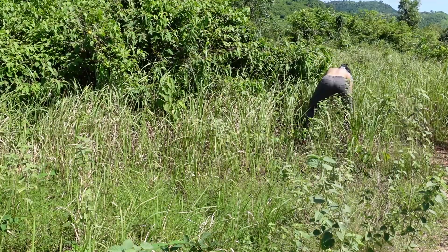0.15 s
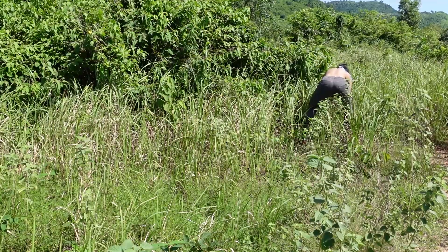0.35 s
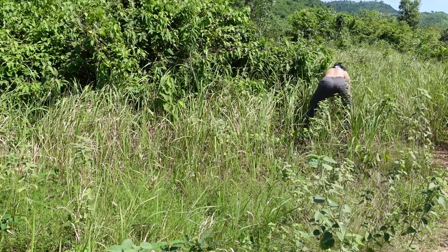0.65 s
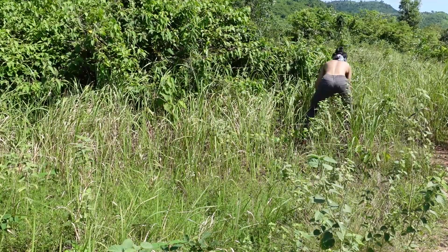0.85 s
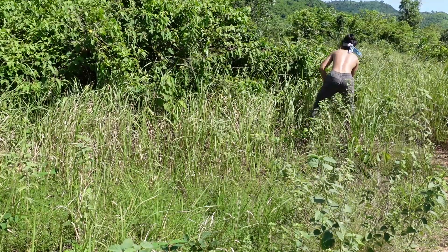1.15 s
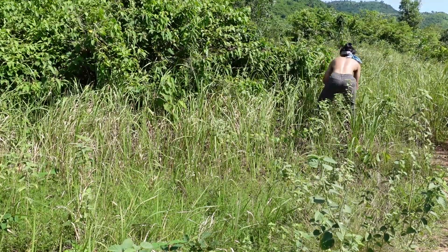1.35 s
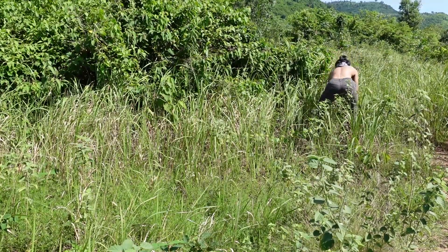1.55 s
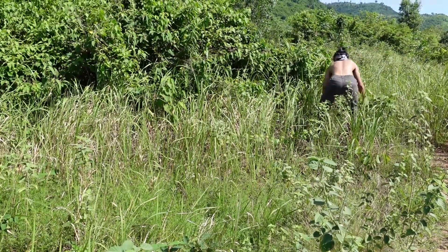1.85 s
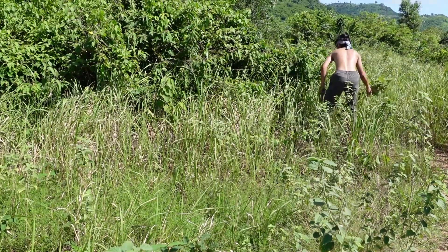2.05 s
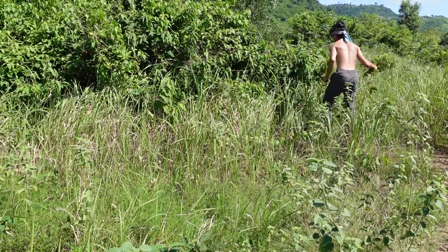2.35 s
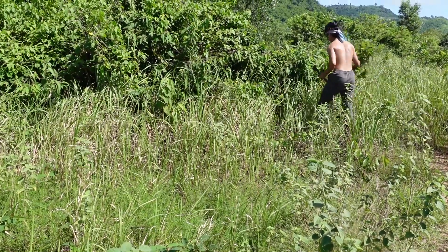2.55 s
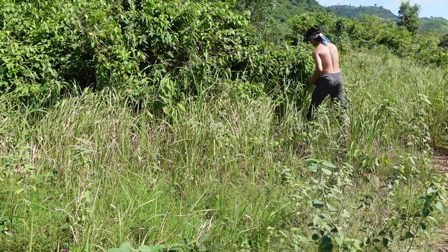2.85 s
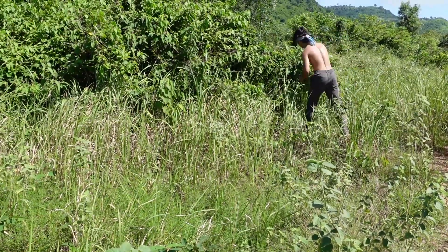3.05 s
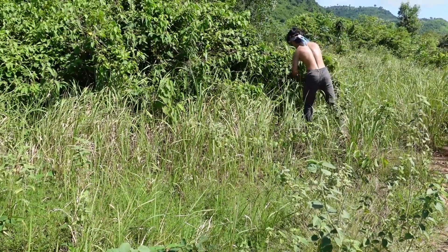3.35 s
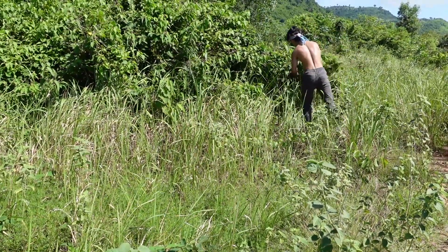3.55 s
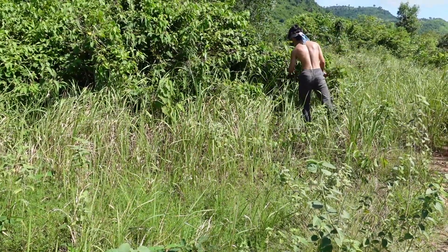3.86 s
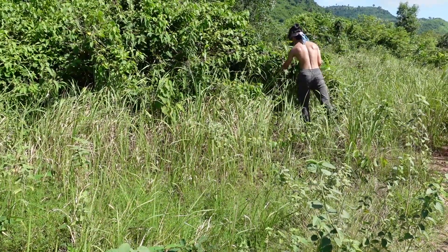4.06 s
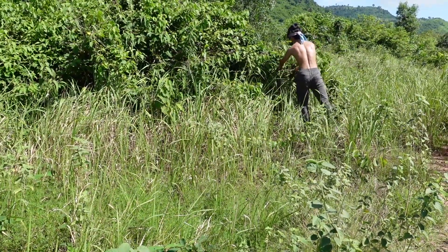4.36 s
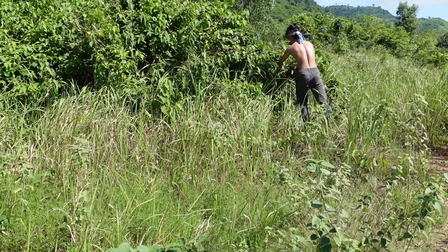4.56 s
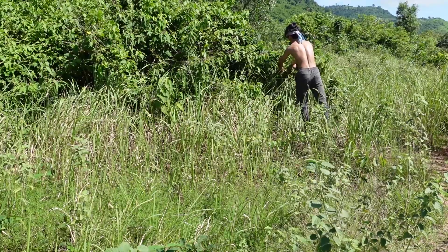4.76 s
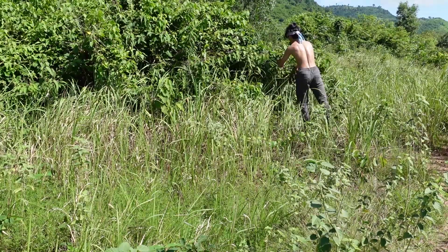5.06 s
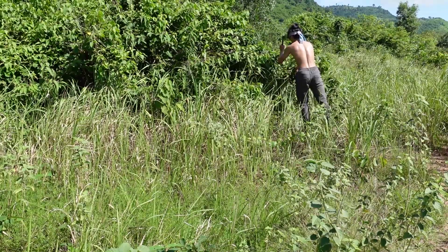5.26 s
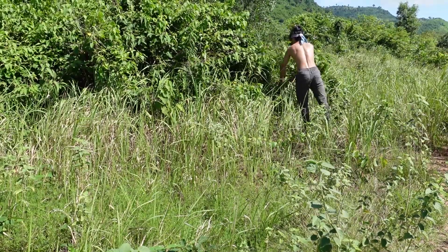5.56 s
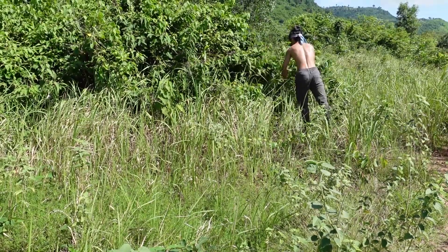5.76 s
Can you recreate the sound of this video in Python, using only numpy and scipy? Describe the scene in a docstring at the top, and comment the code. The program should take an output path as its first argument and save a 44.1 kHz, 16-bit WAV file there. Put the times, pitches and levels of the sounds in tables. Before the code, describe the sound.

Tall dry grass rustles and crackles as someone pushes through it, snapping stems, with a small bird and a cricket chirping faintly behind.

```python
"""Tall dry grass hisses and crackles as someone pulls and wades through it a few metres away.
Many tiny breaks shake the blades, stems and branches; stems snap, one creaks, and three blows thud
into the brush. Behind this a small bird whistles falling notes, a cricket rubs its wings in bouts
of chirps, faint peeps come from far off and two insects drone by over a low, distant wind."""
import sys
import numpy as np
from scipy import signal
from scipy.fft import rfft, irfft, next_fast_len
from scipy.io import wavfile
from scipy.ndimage import uniform_filter1d

SR = 44100
rng = np.random.default_rng(int(sys.argv[2]) if len(sys.argv) > 2 else 0)


def wav_out(sig):
    """Save sig, one row per channel (or a flat mono array), as 16-bit PCM at SR to the path in sys.argv[1]."""
    wavfile.write(sys.argv[1], SR, np.round(np.clip(np.atleast_2d(sig).T, -1, 1) * 32767).astype(np.int16))


N = 260631
T = np.arange(N) / SR


def undb(db):
    """Turn decibels into a number to multiply by."""
    return 10 ** (np.asarray(db) / 20)


def colour(x, points):
    """Turn the lows and highs of x up or down along a curve of (f/Hz, level/dB) points."""
    size = next_fast_len(N + SR // 10)
    hz, db = np.transpose(points)
    axis = np.maximum(np.arange(size // 2 + 1) * SR / size, 1)
    gain = undb(np.interp(np.log(axis), np.log(hz), db))
    return irfft(rfft(x, size) * gain, size)[..., :N]


def unit(x):
    """Scale x to an average strength (rms) of 1."""
    return x / np.sqrt(np.mean(x ** 2))


def wander(per_second):
    """A random curve that changes about this many times a second."""
    return unit(uniform_filter1d(rng.standard_normal(N), SR // per_second))


def add(out, start_s, sound):
    """Mix a sound into out at the given time."""
    i = int(start_s * SR)
    out[i:i + len(sound)] += sound[:len(out) - i]


def ring(modes, t):
    """A struck thing rings with fading tones; t60 is the time a tone takes to fall by 60 dB."""
    return sum(undb(db) * np.sin(2 * np.pi * hz * t) * 1000 ** (-t / t60) for hz, db, t60 in modes)


def echo(x, t60, db):
    """Sound bounces off leaves and trunks and comes back as a fading blur."""
    t = T[:int(t60 * SR)]
    tail = unit(rng.standard_normal(len(t)) * 1000 ** (-t / t60)) / np.sqrt(len(t))
    return undb(db) * signal.fftconvolve(x, tail)[:N]


# How strong the wind is from low to high: f/Hz, level/dB
WIND_SPECTRUM = [(18, -72), (30, -58), (55, -14.5), (179, -1), (221, -1), (252, 0.5), (1100, -14),
                 (1460, -15.5), (1960, -11.5), (3060, -25), (6210, -16), (6720, -22), (8080, -23.5),
                 (16000, -23)]
def wind():
    """Far wind in the trees, wavering a little."""
    return unit(colour(rng.standard_normal((2, N)), WIND_SPECTRUM)) * undb(-60 + .6 * wander(8))


# A fly and a bee passing by: t/s, wingbeat f/Hz, level/dB
FLY_PATH = [(1.73, 297, -70), (1.77, 297, -62), (1.8, 304, -60), (1.86, 298, -62), (1.94, 297, -70)]
BEE_PATH = [(2.3, 213, -73), (2.38, 205, -66), (2.42, 215, -52.5), (2.48, 205.6, -65), (2.6, 226.3, -63),
            (2.7, 210.5, -64), (2.78, 212, -75)]
# The tones in the fly's buzz: multiple of the wingbeat, level/dB
FLY_TONES = [(2, -3), (3, -12), (4, -1), (5, 0), (6, -2), (7, -12)]
def insect(path, tones, lead):
    """Beating wings hum at multiples of their rate; the left side is ahead by lead radians."""
    s, hz, db = np.transpose(path)
    phase = 2 * np.pi * np.cumsum(np.interp(T, s, hz)) / SR
    fade = np.clip(np.minimum(T - s[0], s[-1] - T) / .033, 0, 1)
    buzz = sum(undb(level) * np.sin(k * phase + np.array([[lead], [0]])) for k, level in tones)
    return np.sqrt(2) * buzz * fade * undb(np.interp(T, s, db))


# Distant peeps: t/s, length/s, level/dB
PEEPS = [(3.375, .026, -63), (3.575, .02, -66), (3.625, .022, -64), (3.838, .02, -67)]
def peeps(hz=8050):
    """A few faint, very high peeps from far off, all on one pitch."""
    out = np.zeros(N)
    for s, length, db in PEEPS:
        t = T[:int(length * SR)]
        swell = np.sqrt(np.sin(np.pi * t / length))
        add(out, s, undb(db) * swell * np.sin(2 * np.pi * hz * t))
    return out


# Runs of cricket chirps: start t/s, end t/s, chirp rate/Hz, level/dB
CHIRP_BOUTS = [(.143, .9, 25.2, -50.5), (1.345, 2.11, 25, -52), (2.761, 3.365, 25.35, -51.5),
               (3.842, 4.51, 25.6, -54), (5.028, 5.8, 26.1, -50.5)]
def cricket(wing_hz=4975, low_wing_hz=4700, stroke_s=.0085, spacing_s=.0112):
    """Two wing strokes make a chirp; each rings the wing at a main pitch and a weaker, lower one."""
    out = np.zeros(N)
    progress = T[:int(stroke_s * SR)] / stroke_s
    swell = np.sin(np.pi * progress ** 1.5)  # grows, then stops short
    low_swell = undb(-10) * np.sin(np.pi * progress)
    low_phase = 2 * np.pi * low_wing_hz * stroke_s * progress
    for start, end, rate, db in CHIRP_BOUTS:
        for k, s in enumerate(np.arange(start, end, 1 / rate)):
            detune, accent, offset = rng.standard_normal((3, 2))
            soft_start_db = -2.8 * np.exp(-k / 3)
            for stroke in range(2):
                hz = wing_hz * (1 + .006 * detune[stroke] - .04 * (progress - .6))
                main = swell * np.sin(2 * np.pi * np.cumsum(hz) / SR + 2 * offset[stroke])
                low = low_swell * np.sin(low_phase + 2 * offset[1 - stroke])
                gain = undb(db + .71 * accent[stroke] + 1.2 * stroke + soft_start_db)
                add(out, s + (stroke - 1) * spacing_s, gain * (main + low))
    out *= 1 + .2 * wander(900)  # the wing's tiny teeth catch unevenly
    return out + echo(out, t60=.13, db=-4)


# The bird's phrases: first long note t/s, number of short notes, of long notes, middle note level/dB
PHRASES = [(.0105, 0, 3, -50), (1.247, 5, 3, -48), (2.546, 4, 2, -46), (3.649, 6, 3, -51),
           (4.902, 4, 3, -45)]
def song(short_step_s=.0372, middle_step_s=.052, long_step_s=.0605):
    """List the notes as (t/s, kind, level/dB): short ones growing louder, a middle one, long ones."""
    notes = []
    for s, shorts, longs, db in PHRASES:
        middle_s = s - middle_step_s
        for k in range(1, shorts + 1):  # counting back from the middle note
            notes.append((middle_s - k * short_step_s, "short", -57 - 7 * 2 ** (k - shorts)))
        notes.append((middle_s, "middle", db))
        notes += [(s + k * long_step_s, "long", -45) for k in range(longs)]
    return [note for note in notes if note[0] >= 0]


# Each kind of bird note: length/s, top f/Hz, bottom f/Hz
NOTE_SHAPES = {"short": (.026, 6450, 6050), "middle": (.04, 6570, 5900), "long": (.047, 7150, 5860)}
def bird(throat_hz=6300, throat_width_hz=330):
    """Falling whistles, loudest as they pass the pitch at which the throat rings."""
    out = np.zeros(N)
    for s, kind, db in song():
        length, top_hz, bottom_hz = NOTE_SHAPES[kind]
        progress = T[:int(length * SR)] / length
        hz = bottom_hz + (top_hz - bottom_hz) * (1 - progress) ** 1.5
        throat = 1 / (1 + ((hz - throat_hz) / throat_width_hz) ** 2)
        fade = np.clip(np.minimum(progress, 1 - progress) * length / .003, 0, 1)
        add(out, s, undb(db) * throat * fade * np.sin(2 * np.pi * np.cumsum(hz) / SR))
    bounce = undb(-17) * np.roll(out, int(.033 * SR))  # one clear echo off the bushes
    return out + bounce + echo(out, t60=.22, db=-9)


# Slips of a bent stem: t/s, peak level/dB
SLIPS = [(3.628, -50), (3.64, -45), (3.651, -44), (3.664, -49), (3.68, -49), (3.703, -50)]
# The tones that stem rings with: f/Hz, level/dB, fade t60/s
CREAK_TONES = [(2680, 0, .011), (3400, -3, .008), (4600, -7, .006)]
def creaks():
    """A bent stem slips a few times, and each short scrape makes it ring."""
    out, t = np.zeros(N), T[:SR // 20]
    for s, db in SLIPS:
        scrape = rng.standard_normal(len(t)) * np.exp(-t / .006)
        rasp = np.convolve(scrape, ring(CREAK_TONES, t))
        add(out, s, undb(db) * rasp / np.abs(rasp).max())
    return out


# Blows into the brush: t/s, level/dB, push length/s
BLOWS = [(0.579, -33.5, 0.00026), (1.659, -38.5, 0.0047), (5.584, -43, 0.0013)]
# The tones of the ground and thick stems: f/Hz, level/dB, fade t60/s
THUD_TONES = [(240, 0, .12), (165, -13, .1), (330, -6, .07), (918, -3, .06)]
def thuds():
    """A push rings the ground and thick stems; the longer the push, the duller the thud."""
    out = np.zeros(N)
    for s, db, push_s in BLOWS:
        push = np.hanning(int(max(push_s, .0003) * SR) + 2)
        add(out, s, undb(db) * np.convolve(ring(THUD_TONES, T[:SR // 4]), push / push.sum()))
    bass_cut = signal.butter(3, 140, "highpass", fs=SR, output="sos")  # small things give no deep bass
    return signal.sosfilt(bass_cut, out)


# Stems breaking: t/s, level/dB, ring f/Hz, fade scale/s
SNAPS = [(0.557, -32, 4000, 0.03), (0.5624, -20.5, 4700, 0.06), (.5745, -27, 5000, .03),
         (.584, -23, 4500, 0.011), (0.591, -29, 4000, 0.022), (0.5778, -14, 2900, 0.012),
         (0.778, -33, 4300, .022), (1.1, -27, 6800, .025), (1.1468, -29, 5000, .03),
         (1.17, -29.5, 6190, 0.018), (1.6194, -34, 2570, 0.015), (1.631, -34, 3700, .015),
         (1.637, -32, 3000, .018), (1.674, -30, 4000, 0.0069), (1.66, -20.5, 2800, 0.014),
         (1.669, -24, 3400, 0.018), (2.021, -40, 3960, .02), (2.109, -33.5, 4000, .02),
         (2.34, -34, 6400, .015), (2.4285, -31, 11000, .008), (2.85, -37, 5000, .01),
         (3.052, -40, 9000, 0.024), (3.219, -40, 8000, .02), (4.724, -34, 11000, .02),
         (4.758, -34, 9000, .01), (4.808, -30, 6800, .01), (4.866, -29, 9000, .02), (5.141, -39, 9100, .02),
         (5.524, -42, 6000, .03), (5.547, -29, 6000, .03), (5.579, -30, 5000, 0.03),
         (5.602, -20, 1950, 0.032), (5.7065, -11, 5000, .045), (5.7072, -11, 10000, .04),
         (5.543, -34, 4200, .02), (5.647, -24, 11000, .02), (5.724, -24, 5400, 0.016)]
def snaps():
    """A dry stem breaks: a sharp crack, a short ring and a rough tail."""
    out, t = np.zeros(N), T[:SR // 10]
    for s, db, hz, fade_s in SNAPS:
        crack = 1000 ** (-t / (.3 * fade_s))
        tail = .32 * 1000 ** (-t / (2 * fade_s))
        burst = rng.standard_normal(len(t)) * (crack + tail)
        ringing = signal.lfilter(*signal.iirpeak(hz, 1.5, SR), burst)
        snap = .16 * np.diff(burst, prepend=0) + ringing
        add(out, s, undb(db) * snap / np.abs(snap).max())
    return colour(out, [(100, -39), (900, -2)])


# Steady wading: t/s, blade level/dB, stems above blades/dB, branches above blades/dB
WADING = [(0, -47.5, -2.5, -9.5), (.256, -60.5, 1.5, -5), (.36, -74.5, 5, 7), (.5, -76, 2, 6),
          (.7, -53, -2.5, -8), (.886, -51.5, -3, -10), (.958, -55.5, 0, -11), (1.26, -58.5, -4, -5.5),
          (1.6, -74.5, 2, 11.5), (1.83, -51, -3, -9.5), (2.17, -56, -3.5, -10), (2.33, -54.5, -3, -15),
          (2.6, -47, -6.5, -19.5), (2.76, -50.5, -3.5, -9), (3.19, -64, 0.5, -5.5), (3.5, -69, 0.5, 1),
          (3.72, -85.5, 19, -5), (3.92, -79, 6, 5), (4.13, -57, -4.5, -10), (4.4, -55, -0.5, -12.5),
          (4.8, -49.5, -2.5, -12.5), (5.1, -56, 0.5, -10), (5.4, -61.5, -3, -9), (5.5, -72, 3, 1),
          (5.91, -47.5, 0.5, -13)]
# Single sweeps through the grass: peak t/s, blade level/dB, rise time/s, fade t60/s,
# stems above blades/dB, branches above blades/dB
SWEEPS = [(0.581, -38.5, 0.057, 0.32, -0.5, -7), (1.095, -52, 0.085, 0.39, -2, -19),
          (1.145, -48.5, .03, 0.18, -2, -14), (1.33, -50.5, 0.21, 2.5, -2, -22),
          (1.658, -38, 0.058, 0.3, -2, -11.5), (1.79, -63, 0.2, 0.24, 13, 5),
          (2.13, -50, 0.064, 0.35, -8, -19), (2.35, -54, .03, 0.29, -16, -24),
          (2.49, -47, 0.12, 0.09, -15, -22), (2.67, -50, 0.07, 0.15, -1, -9),
          (3.216, -58, .03, 0.45, -7, -20), (3.568, -60.5, 0.085, 0.31, -8, -22),
          (3.65, -71.5, 0.12, 0.25, 12, -11), (.81, -57.5, 0.062, 0.21, 7.5, -14),
          (2.02, -54.5, .04, 0.53, -0.5, -16), (4.106, -59, .02, .2, -12, -18),
          (4.58, -59.5, 0.069, 0.22, 9.5, -18), (4.876, -50, 0.062, 0.23, -15, -18),
          (5.056, -51, 0.2, 0.1, 0, -20), (5.552, -37.5, 0.028, .06, 0.5, -16),
          (5.588, -29.5, 0.06, 0.54, 1, -8.5), (5.73, -41, 0.17, 0.93, 1.5, -7)]
def motion(rise_db=30):
    """How loud blades, stems and branches are over time, in dB: the wading plus every sweep."""
    s, db, *above = np.transpose(WADING)
    power = undb(2 * np.array([np.interp(T, s, db + extra) for extra in (0, *above)]))
    for s, db, rise_s, t60, *above in SWEEPS:
        shape_db = -np.maximum(rise_db * (s - T) / rise_s, 60 * (T - s) / t60)
        peak_db = db + np.array([[0, *above]]).T
        power += undb(2 * (peak_db + shape_db))
    return 10 * np.log10(power)


def crackle(per_second, spread_db, fade_s):
    """The loudness of many tiny breaks: each starts at once and dies fast, and a few are far bigger."""
    happens = rng.random(N) < per_second / SR
    breaks = happens * undb(2 * spread_db * np.minimum(rng.exponential(size=N), 4))
    keep = np.exp(-1 / (fade_s * SR))
    power, _ = signal.lfilter([1], [1, -keep], breaks, zi=[breaks.mean() / (1 - keep)])
    return unit(np.sqrt(power + 1e-9))


def leaves(spectrum, db):
    """Single dry leaves tick at twelve pitches, each pitch coming in flurries."""
    out = 0
    for hz in np.geomspace(1400, 10000, 12):
        flurries = undb(5 * wander(12))
        happens = rng.random(N) < 200 / SR
        ticks = happens * rng.standard_normal(N) * flurries / np.sqrt(hz)
        out += signal.lfilter(*signal.iirpeak(hz, 12, SR), ticks)
    return unit(colour(out, spectrum)) * undb(db)


# The tone of hissing blades, crackling stems and woody branches: f/Hz, level/dB
BLADE_SPECTRUM = [(2500, -27), (4500, -4), (6000, 1), (7500, -1.5), (10500, -3), (13500, -5.5),
                  (15000, -15), (16000, -23.5)]
STEM_SPECTRUM = [(800, -46), (1500, -6), (2200, -3), (3200, 0.5), (4500, 1.5), (5500, -3), (8000, -9)]
BRANCH_SPECTRUM = [(300, -18), (600, -1.5), (900, -3), (1300, 0.5), (2200, -14)]
def brush():
    """The same breaks shake blades, stems and branches; each answers in its own range of pitch."""
    levels = motion()
    shared_breaks = crackle(per_second=900, spread_db=1.5, fade_s=.007)
    out = 0
    for spectrum, db in zip((BLADE_SPECTRUM, STEM_SPECTRUM, BRANCH_SPECTRUM), levels):
        own_breaks = crackle(per_second=900, spread_db=1.8, fade_s=.006)
        rustle = shared_breaks * own_breaks * rng.standard_normal((2, N))
        out += unit(colour(rustle, spectrum)) * undb(db)
    leaf_db = levels[1] - 4  # a little softer than the stems
    return out + [leaves(STEM_SPECTRUM, leaf_db) for _ in range(2)]


def stereo(middle, other, width):
    """Make a sound wide: add a second signal on the left and take it away on the right."""
    return middle + colour(other, width) * np.array([[1], [-1]])


# How wide the wind and the brush sound: f/Hz, side level above the middle/dB
WIND_WIDTH = [(60, -14), (110, -1.5), (200, -5), (380, -4), (700, -4.5), (1290, 0.5), (2380, -7.5),
              (4400, 6.5), (8120, -5.5), (15000, -102)]
BRUSH_WIDTH = [(200, -3), (700, -7), (1300, -10), (2400, -14), (4400, -13.5), (8100, -29), (15000, -30)]
def scene():
    """Wind all round, bird, cricket and peeps a little to the left, and the brush in front."""
    near, far = brush(), wind()
    hits = snaps() + thuds() + creaks()
    near += [hits + echo(hits, t60=.12, db=-13), echo(hits, t60=.04, db=0)]  # middle, side
    calls = undb([[.8], [-.8]]) * (bird() + cricket() + peeps())
    fly = insect(FLY_PATH, FLY_TONES, lead=-1.26)
    bee = insect(BEE_PATH, [(.97, 0)], lead=-1.3)
    return stereo(*far, WIND_WIDTH) + fly + bee + calls + stereo(*near, BRUSH_WIDTH)


# How the two microphones differ: f/Hz, left minus right level/dB
MIC_BALANCE = [(30, -6), (60, -4), (125, -1), (250, 0), (500, 2), (1000, 0)]
def record(dry):
    """Left and right differ in the bass; deep rumble and the very highest treble are cut."""
    hz, db = np.transpose(MIC_BALANCE)
    mics = [colour(x, np.c_[hz, sign * db / 2]) for x, sign in zip(dry, (1, -1))]
    rumble_cut = signal.butter(2, 45, "highpass", fs=SR, output="sos")
    treble_cut = signal.ellip(10, .2, 60, 15900, fs=SR, output="sos")
    return signal.sosfilt(treble_cut, signal.sosfilt(rumble_cut, mics))


dry = scene()
out = record(dry)
wav_out(out)
```